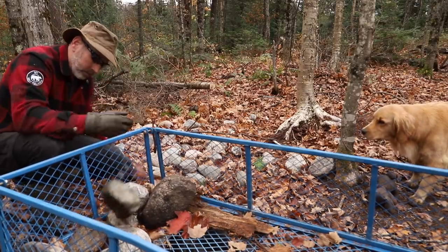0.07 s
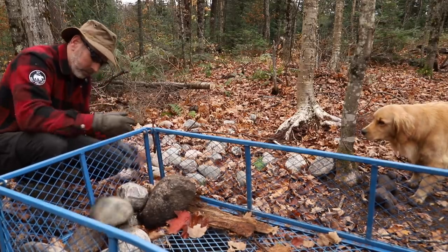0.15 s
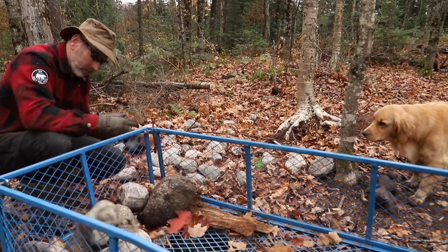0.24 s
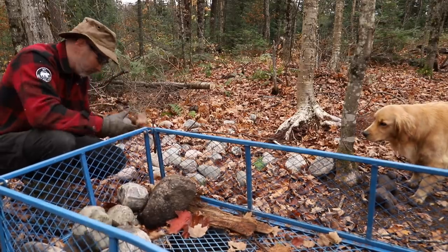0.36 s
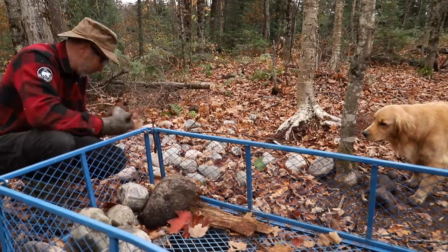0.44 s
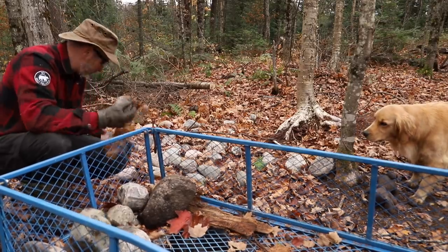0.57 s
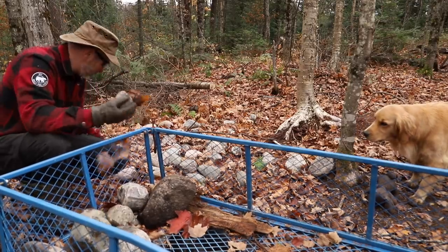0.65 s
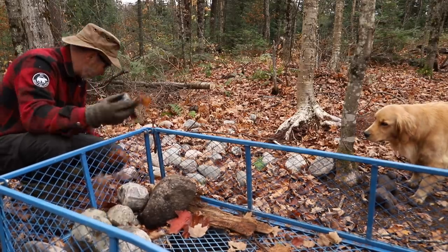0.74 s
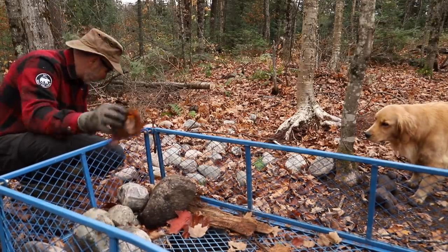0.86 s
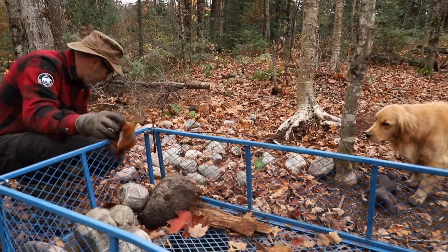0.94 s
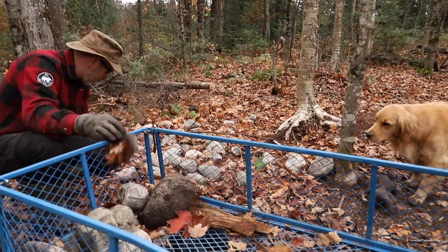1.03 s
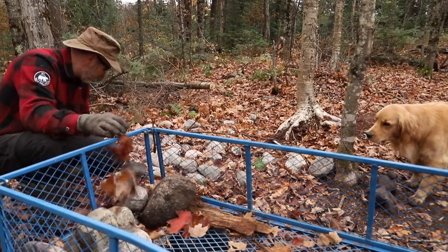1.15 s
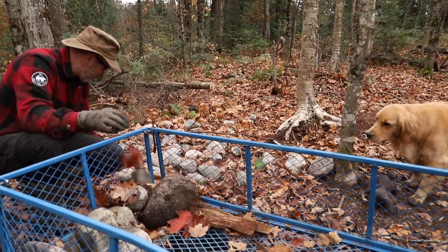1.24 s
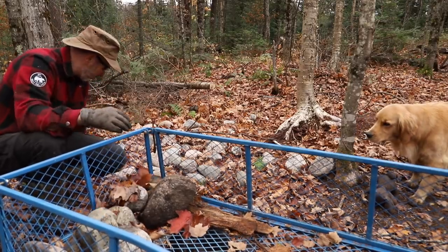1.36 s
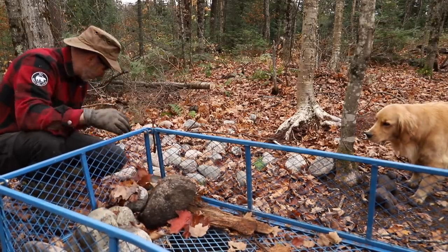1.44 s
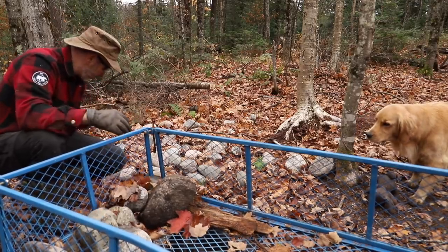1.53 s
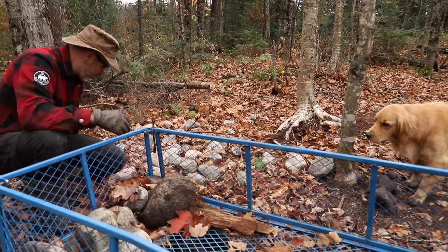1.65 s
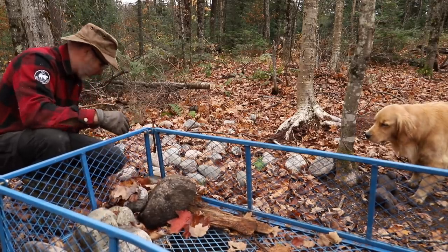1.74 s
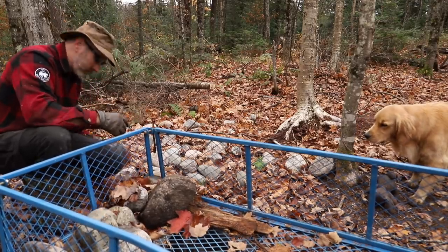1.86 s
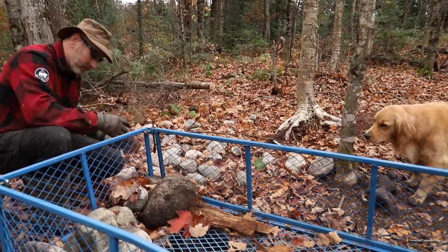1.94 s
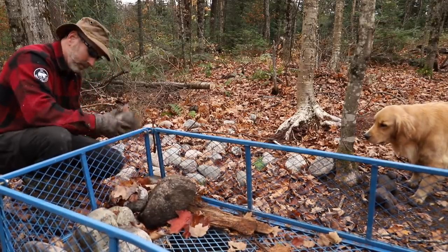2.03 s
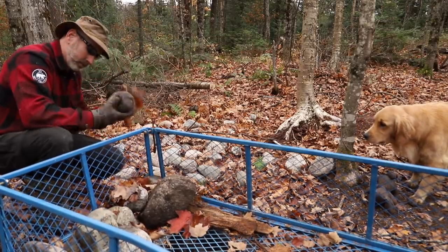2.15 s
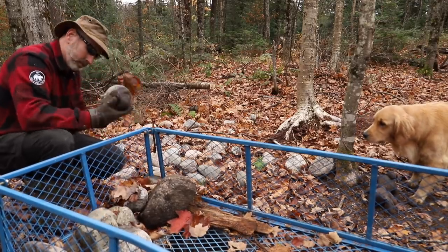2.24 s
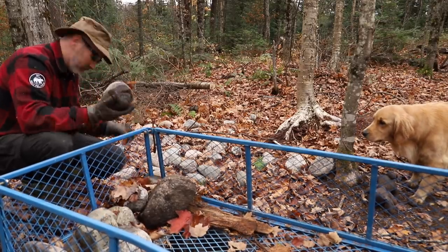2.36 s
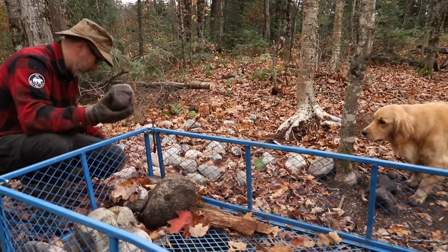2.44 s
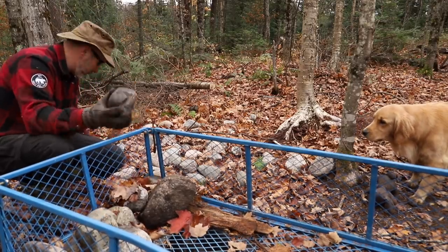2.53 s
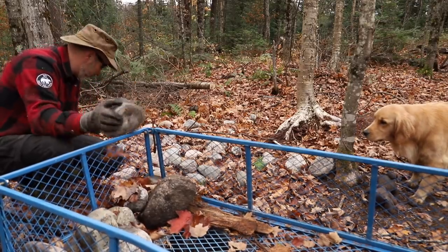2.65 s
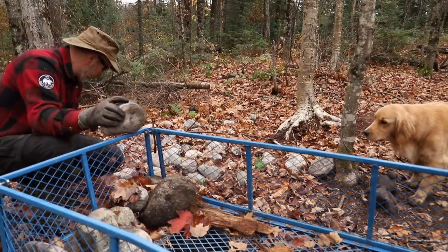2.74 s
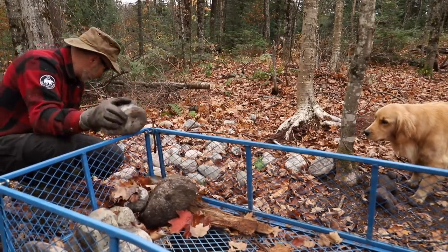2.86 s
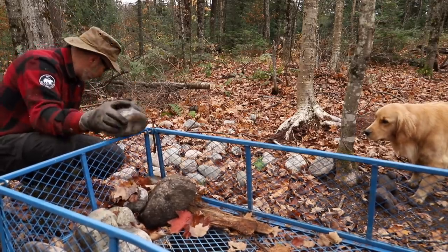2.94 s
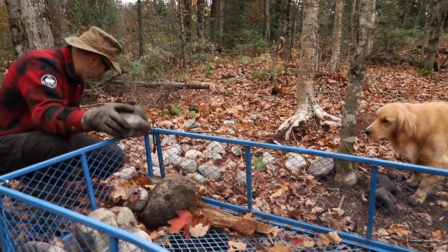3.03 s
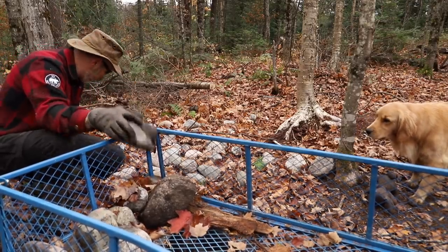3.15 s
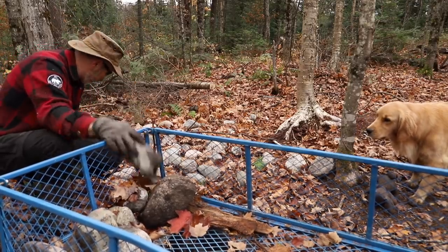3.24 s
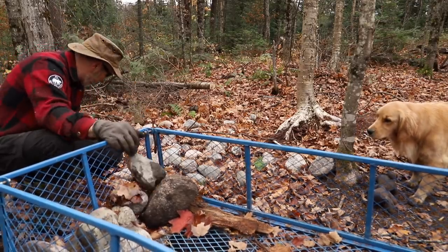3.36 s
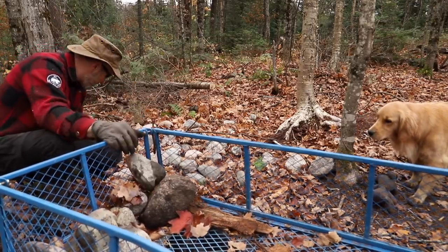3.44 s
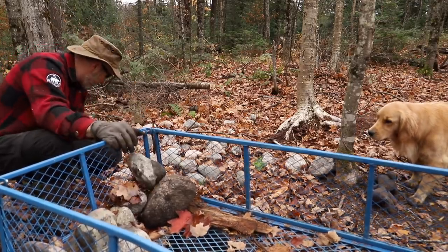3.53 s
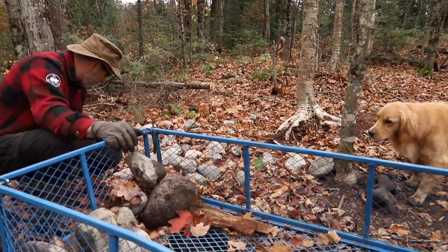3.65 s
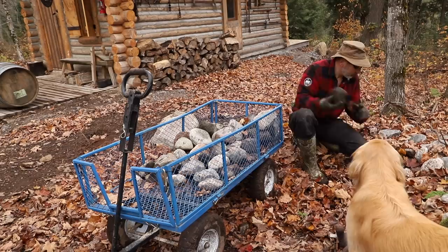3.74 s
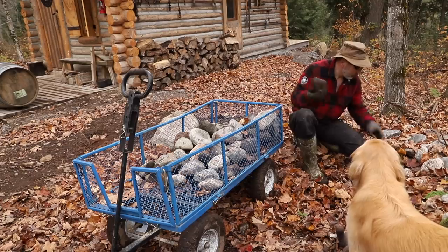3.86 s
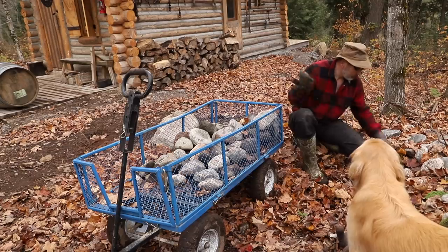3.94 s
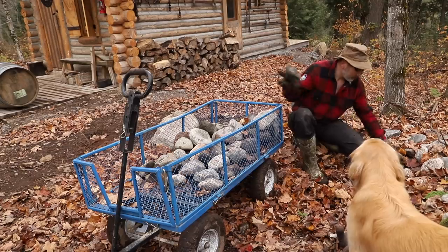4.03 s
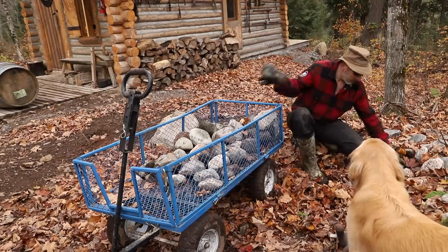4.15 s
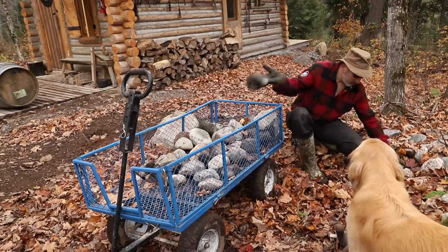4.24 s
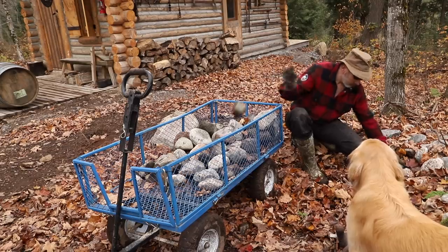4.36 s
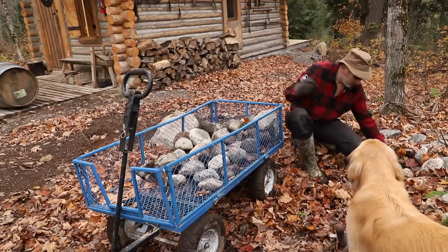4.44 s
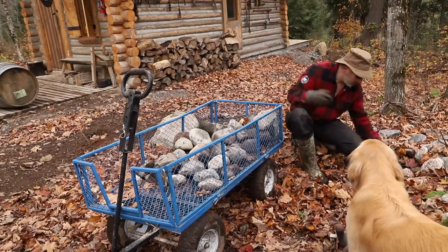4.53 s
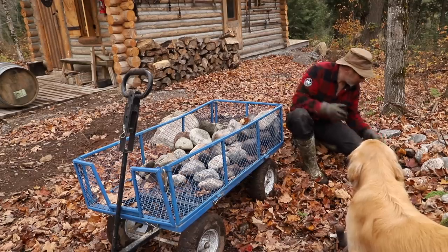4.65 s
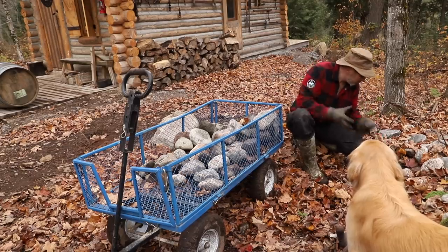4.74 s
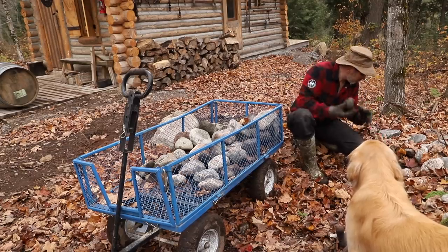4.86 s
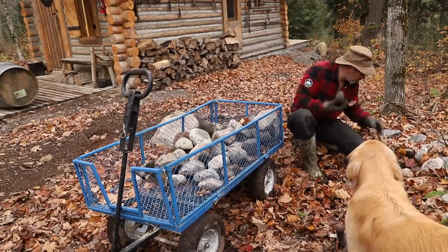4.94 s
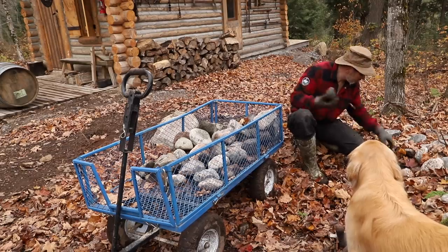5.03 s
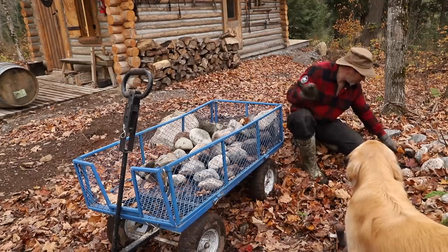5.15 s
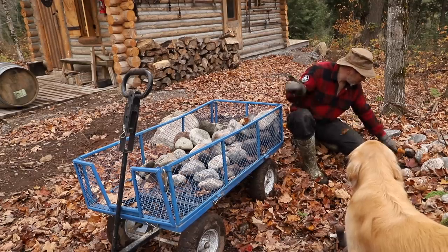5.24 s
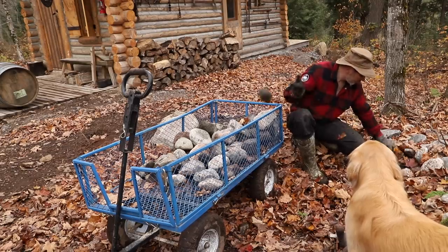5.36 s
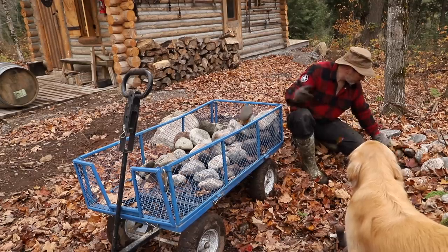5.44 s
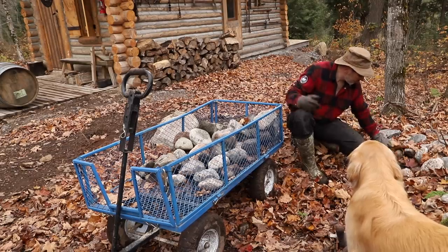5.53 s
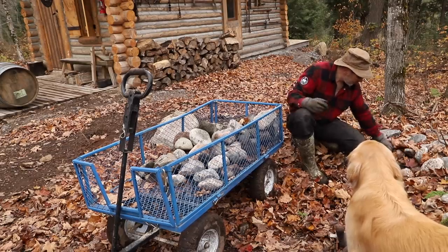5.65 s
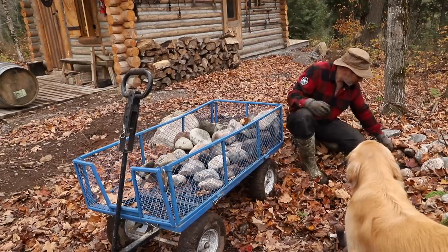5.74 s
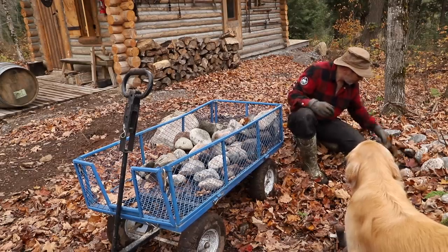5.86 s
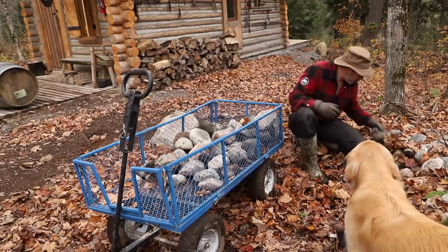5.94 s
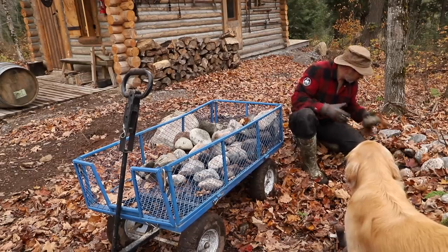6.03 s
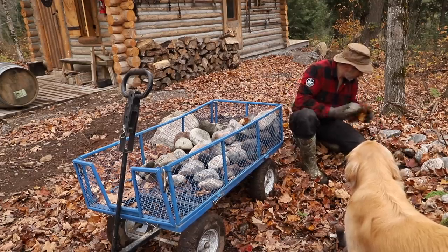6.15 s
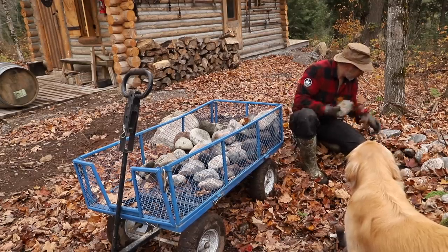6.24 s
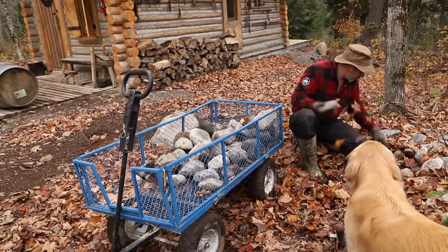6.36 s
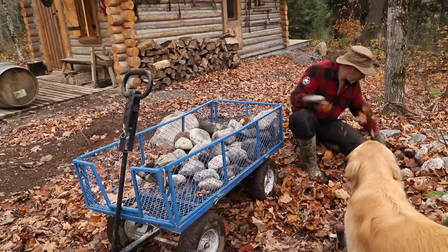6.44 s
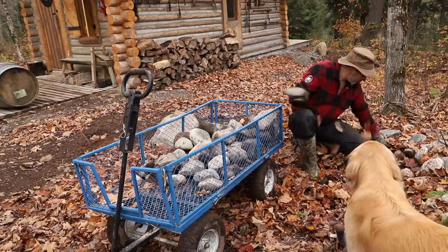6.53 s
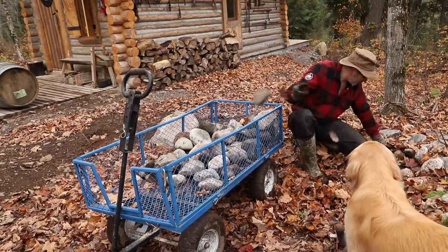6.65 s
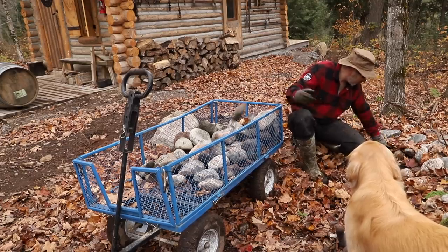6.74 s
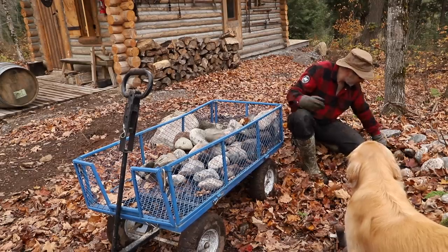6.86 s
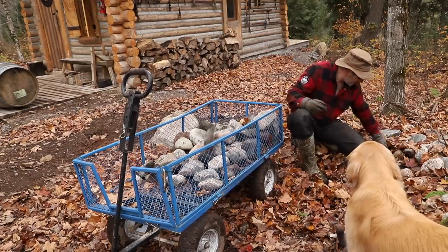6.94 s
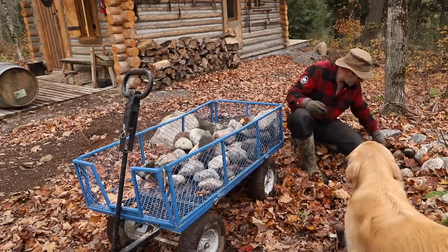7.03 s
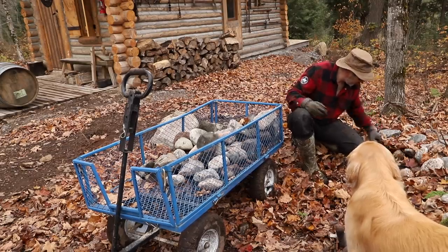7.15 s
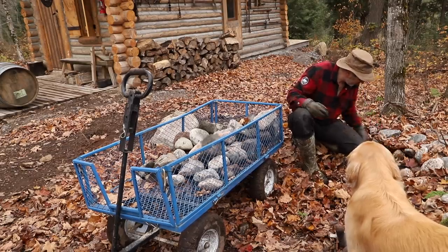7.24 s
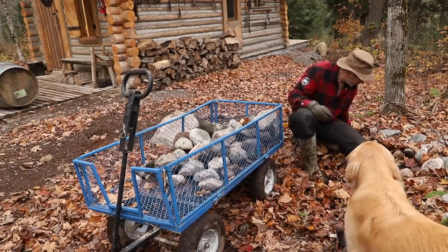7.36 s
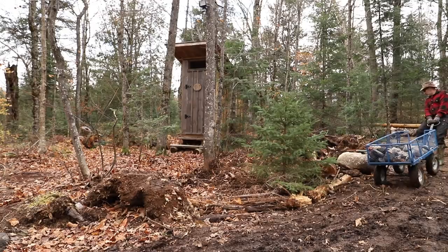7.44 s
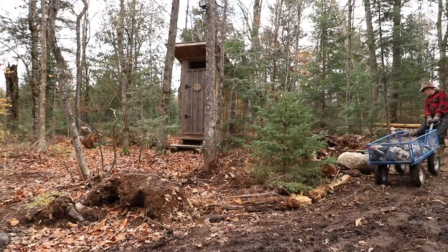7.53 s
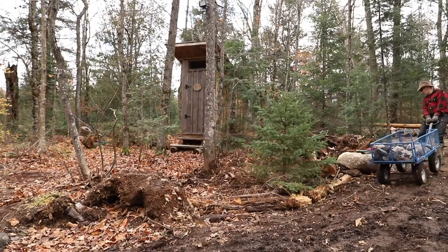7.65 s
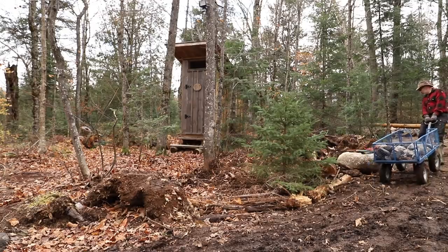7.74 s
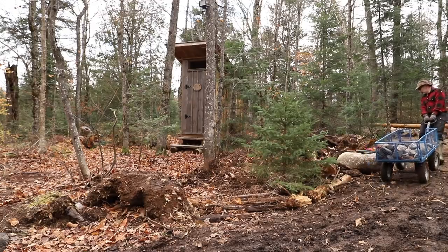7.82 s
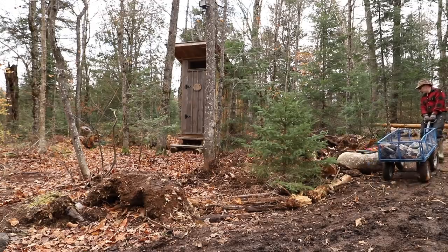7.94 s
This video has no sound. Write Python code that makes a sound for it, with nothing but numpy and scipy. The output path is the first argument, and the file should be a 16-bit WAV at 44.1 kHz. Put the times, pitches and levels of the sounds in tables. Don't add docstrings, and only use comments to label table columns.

```python
import sys
import numpy as np
from scipy import signal
from scipy.fft import rfft, irfft, next_fast_len
from scipy.io import wavfile
from scipy.ndimage import uniform_filter1d

SR = 44100
rng = np.random.default_rng(int(sys.argv[2]) if len(sys.argv) > 2 else 0)


def digitize_waveform(pressure):
    field = np.atleast_2d(pressure).T
    bounded = np.clip(field, -1, 1)
    quanta = np.round(bounded * 32767).astype(np.int16)
    wavfile.write(sys.argv[1], SR, quanta)


def level_to_linear(level):
    exponent = np.asarray(level, float) / 20
    return 10 ** exponent


N = 352355
TIME_S = np.arange(N) / SR

# start_s, left_lag_samples, then left over right of buzz_db, rattle_db, clacks_db
POSITIONS = [
    (0, -2.5, -6.5, -2, 0.5),
    (3.818, 2, -2.5, -5, -2),
    (5.0, 1, -8.5, -11, -4.5),
    (5.75, -2.5, -3, -9.5, -2.5),
    (7.484, 15, -19, -5, 3.5),
]
SECOND_PLACE_S, THIRD_PLACE_S = POSITIONS[1][0], POSITIONS[-1][0]
# pitch_hz, likeness (-1 to 1)
LIKENESS = [(40, 0.043), (150, 0.85), (600, 0.69), (1400, 0.49), (3000, -0.32), (8000, 0.017)]

# pitch_hz, level_db
AIR = [(15, -41), (25, -9.5), (59, -16), (123, -6), (153, -9), (405, -10.5), (3720, -14.5), (16000, -27)]
AIR_DB = -54.5
# time_s, level_db
HUM = [(0.0, -58.5), (3.28, -60), (3.8, -61.5)]
HUM_HZ = 78
# time_s, level_db
RUMBLE = [(0.0, -55), (2.6, -74), (2.76, -78.5), (6.99, -79.5), (7.99, -58.5)]

# pitch_hz, level_db
LEAVES = [(600, -40), (1100, -3.5), (1460, -6), (3040, 2), (5100, -1.5), (6560, -0.5), (11300, -7.5),
          (16000, -16.5)]
STEM_SHARE = 0.5
# pitch_hz, level_db
PILE = [(35, -52.5), (60, -4.5), (142, -5), (281, 0), (1830, 1.5), (2500, -7.5), (3250, -37), (5500, -120)]
# pitch_hz, level_db
MESH = [(1300, -43), (1770, -14), (2300, 4.5), (3000, 5), (4190, 0.5), (6190, -2), (9000, -8),
        (11700, -54.5)]
SHEEN_HZ, SHEEN_NEAR_DB, SHEEN_FAR_DB, SHEEN_DRIFT_DB = 3260, -18.5, -5, 8

# start_s, length_s, crackle_db, swell_db (change over the length)
SWEEPS = [(0.594, 0.37, -50.5, 8), (1.696, 0.78, -41.5, -13.5), (2.514, 0.19, -62, 18),
          (3.001, .3, -33, -7), (3.683, .14, -50.5, 5), (3.812, 0.79, -64, 1), (4.508, 0.16, -65, -8),
          (4.845, 0.34, -51, -19), (5.195, 0.44, -54, 3.5), (6.076, 0.22, -48, 5.5), (6.5, 0.57, -49, 0.5),
          (6.935, 0.57, -50, 7.5), (7.497, .6, -52, 1)]
SWEEP_MESH_DB, SWEEP_PILE_DB = -11, -11
# start_s, length_s, buzz_db, swell_db (change over the length), grinding_db (against buzz)
SHIFTS = [
    (0, 0.25, -24.5, -10, -11),
    (0.289, 0.25, -33, -3.5, -10),
    (0.967, 0.59, -38.5, 6, -12),
    (1.472, 0.49, -34, -35, -8),
    (2.876, 0.15, -38.5, 2, -10),
    (3.256, 0.24, -37.5, 5, -16.5),
    (3.5, 0.11, -37, 1, -14.5),
    (4.614, 0.26, -53, 7.5, -2.5),
    (5.69, 0.35, -47, 0.5, -1),
    (6.97, 0.45, -41.5, -8.5, -25),
]
SHIFT_LEAVES_DB = -4
EDGE_S, RELEASE_DB_PER_S = 0.03, 121
# start_s, buzz_db, t60_s (time to fade 60 dB), rumble_db
JOLTS = [(0.276, -13.5, 0.19, -13), (0.805, -30.5, 0.74, -33.5), (0.977, 3, 0.075, -10),
         (0.989, -15.5, 0.35, -38), (1.23, -7.5, 0.13, -26), (1.24, -18, 0.065, -44),
         (1.375, -12.5, 0.11, -11), (1.387, -11, 0.27, -22.5), (1.152, -24, 0.093, -36),
         (1.305, -23, 0.15, -40), (1.484, -16, 0.59, -29), (2.7378, -2.5, 0.12, -15.5),
         (2.774, -12.5, 0.4, -21.5), (3.009, -19, 0.63, -23.5), (3.284, -11.5, 0.32, -17),
         (3.374, -14, 0.21, -22), (3.383, -10, 0.22, -16), (3.396, -11, 0.058, -20), (3.542, -18, 0.2, -51),
         (3.601, -21, 0.46, -23.5), (4.524, -19.5, 0.52, -15), (4.637, -13.5, 0.027, 2.5),
         (4.723, -24.5, 0.31, -26), (5.6455, -24.5, 0.04, -32), (5.8065, -5, 0.24, -24),
         (5.824, -12, 0.18, -36), (5.843, -16, 0.099, -36), (5.885, -15.5, 0.34, -44),
         (5.923, -15, 0.19, -43), (5.959, -14, 0.26, -26), (5.997, -10.5, 0.12, -28),
         (6.916, -24.5, 0.72, -14), (7.035, -17.5, 0.083, -46), (7.091, -16.5, 0.25, -16),
         (7.112, -12.5, 0.067, -34)]
RATTLE_NEAR_DB, RATTLE_FAR_DB = -8.5, -17.5
# middle_s, half_length_s, leaf_db, pile_db
BRUSHES = [(0.939, 0.042, -31, -46), (2.668, 0.023, -43.5, -41.5), (7.402, 0.028, -35.5, -37.5),
           (7.733, 0.14, -60, -51.5), (2.232, 0.024, -34.5, -41), (2.368, 0.015, -47, -49.5),
           (4.339, 0.064, -45.5, -52.5), (4.94, 0.021, -44, -44.5), (5.014, 0.0086, -48.5, -51),
           (5.246, 0.034, -33, -49), (5.428, 0.021, -35, -55), (5.542, 0.062, -38, -51),
           (6.14, 0.034, -35.5, -63), (6.193, 0.014, -38, -51), (6.242, 0.011, -40, -44),
           (6.3, 0.02, -33.5, -39), (6.508, 0.015, -43.5, -53), (6.57, 0.042, -35.5, -47.5),
           (6.662, 0.03, -34, -54), (6.712, 0.0095, -31.5, -48), (6.76, 0.019, -38, -53),
           (6.828, 0.02, -44.5, -73), (7.264, 0.024, -39.5, -48), (7.343, 0.018, -33, -44.5)]

# start_s, peak_db
FRAME_HITS = [
    (0.978, -54),
    (2.74, -62),
]
FRAME_HZ, FRAME_T60_S = 13056, 1.6
# start_s, peak_db, pitch_hz
THUDS = [(0.256, -27, 330), (0.2736, -13, 340), (0.332, -19.5, 253), (0.497, -26.5, 265),
         (0.976, -26.5, 184), (1.227, -36, 342), (1.374, -30, 136), (1.697, -43, 56.5),
         (2.741, -30.5, 55.7), (3.397, -37, 281), (4.523, -28.5, 227), (5.646, -20.5, 110),
         (5.647, -27, 60), (5.857, -43, 90.5), (7.089, -21, 219), (7.098, -22, 257), (7.106, -25, 263),
         (7.175, -32, 250), (7.378, -20, 480), (7.388, -30, 352), (7.42, -27, 453), (7.463, -18, 537),
         (7.496, -44, 80), (7.548, -48, 119), (7.71, -39, 80)]
THUD_T60_S, THUD_CYCLES = 0.055, 9.7
# start_s, peak_db, pitch_hz, left_over_right_db
TICKS = [(0.3413, -23, 3250, -2), (1.2442, -1.5, 5800, 0), (1.2443, -2.5, 6400, 8),
         (2.462, -34.5, 4400, 10), (3.5487, -13.5, 4700, -21), (3.8068, -28, 3900, -3),
         (4.7955, -13, 4790, 3), (5.2692, -29, 3900, -23), (5.632, -29, 4300, 0), (5.886, -17, 8000, 3),
         (5.9589, -14.5, 7000, 14), (6.908, -27, 5750, 0), (6.33, -23, 6200, -8),
         (6.639, -16.5, 6500, -9.5), (6.695, -22.5, 5770, -11), (6.8693, -23, 5770, -11)]

# pitch_ratio (to its body pitch), level_db
STONE = [(.72, -2.5), (.86, 0), (1., 9.5), (1.17, 0), (1.4, -2), (1.899, -9.5)]
TURN = 0.5
CONTACT_DB, BOUNCE_CONTACT_DB, RAP_CONTACT_DB, CONTACT_S = 0.5, -5, -15.0, 0.00058
# start_s, peak_db, body_hz, t60_s
BLOWS = [(0.031, -18.5, 930, 0.018), (0.04, 1.5, 1408, 0.012), (0.097, -10, 1187, 0.03),
         (0.273, 4, 1600, 0.0124), (0.332, -2.5, 1505, 0.015), (0.426, -18.5, 1270, 0.031),
         (0.978, -10.5, 1580, 0.0045), (1.226, -0.5, 1383, 0.028), (1.228, -3.5, 930, 0.0059),
         (1.373, -4, 1820, 0.024), (2.739, -18.5, 1240, 0.026), (3.395, -5, 1250, 0.012),
         (3.661, -21, 1460, 0.027), (4.5222, 14.5, 1419, 0.015), (4.6357, 5.5, 1603, 0.012),
         (4.638, -6.5, 940, 0.024), (4.639, -5, 1420, 0.012), (4.669, -22, 1185, 0.03),
         (4.793, -22.5, 846, 0.032), (4.846, -12.5, 920, 0.023), (5.645, 12, 1587, 0.012),
         (5.646, -4.5, 908, 0.022), (5.6497, -9.5, 1280, 0.0089), (5.8565, -2, 1580, 0.019),
         (6.265, -37.5, 662, 0.019), (6.918, -0.5, 1254, 0.02), (6.957, -10.5, 1210, 0.028),
         (7.056, -29, 1380, 0.029), (7.088, -17, 510, 0.021), (7.375, -11.5, 1250, 0.009),
         (7.463, -17, 1205, 0.025), (7.759, -35.5, 710, 0.018)]
# start_s, peak_db
BOUNCES = [(0.104, -32), (0.111, -40), (0.127, -13), (0.146, -17), (0.152, -21), (0.213, -11.5),
           (0.285, -13), (0.2868, -14), (0.3437, -6), (0.351, -16), (0.434, -27), (0.54, -24),
           (1.2335, -25), (1.238, -24), (3.404, -10.5), (4.5295, -1), (4.537, -18), (4.5425, -8),
           (4.547, -21.5), (4.5615, -16), (4.648, -9.5), (4.656, -11), (4.71, -19), (5.659, -9),
           (5.69, -21), (5.72, -28), (5.744, -24.5), (5.867, -9), (5.876, -21), (6.929, -14), (6.932, -20),
           (6.963, -13.5), (6.9655, -8), (7.384, -29), (7.39, -20), (7.573, -38), (7.955, -34),
           (7.975, -34.5)]
BOUNCE_PITCH, BOUNCE_T60_S = 0.977, 0.012
# start_s, peak_db, pitch_hz, crack_db (against peak)
HIGH_TONES = [(0.0365, -15, 1650, -0.5), (0.0967, -29, 2600, -13.5), (0.2738, 5, 2437, -18),
              (0.3329, -13.5, 2020, -1.5), (0.2752, -3, 2460, -20), (0.3422, -23, 1915, 4),
              (1.2276, 12, 2060, -15.5), (1.3735, -2.5, 2070, -11.5), (2.7389, 0.5, 2380, -3.5),
              (3.3963, -2, 1890, 4.5), (3.4056, -15, 2840, 1), (3.7125, -31, 2076, -17.5),
              (4.5235, 18.5, 1800, -16.5), (4.524, 3.5, 2587, -19), (4.561, -11, 2450, -22),
              (4.636, -1, 2320, -25.5), (4.6394, 2, 2440, -23), (4.649, -20, 1750, -34),
              (5.6436, 9, 1688, -32.5), (5.645, 1.5, 3375, -18.5), (5.65, 3.5, 2090, -23.5),
              (5.6576, -1, 3280, -11.5), (5.689, -15, 2300, -20.5), (5.807, -8, 3880, -18),
              (5.8568, -18, 1710, -16), (6.9179, -10.5, 1590, -14), (6.957, -7, 2145, -29),
              (7.3758, -39, 1760, -3), (0.278, -13, 1980, -23), (0.334, -11, 2500, -18), (1.3745, -5, 2460, -18),
              (1.379, -21, 1500, -8), (3.604, -21, 2020, -30), (3.609, -22, 2080, -30),
              (3.661, -18.5, 2585, -19), (4.641, -9.5, 1800, -30), (5.6515, -2, 2580, -26),
              (7.091, -20, 1230, -30)]
# start_s, peak_db, crack_db (against peak)
RAPS = [(0.011, -6.5, -17), (0.061, -10, -7), (0.9771, 4.5, -10), (1.39, -22, -14), (1.482, -13.5, -3),
        (2.741, -6, -7), (2.785, -15, -2), (3.2732, -31, -19), (3.2876, -26, -4), (3.6142, -8, -25),
        (5.8135, -7, -25), (6, -12.5, -5), (7.0864, -29.5, 12.5), (7.3895, -30.5, 15)]
RAP_HZ, HIGH_T60_S, RAP_T60_S = 2883, 0.011, 0.022
TREES_T60_S, TREES_DB, TREES_HZ = 0.3, -33, 2000
CUTOFF_HZ = 16250


def rms_one(x):
    return x / np.sqrt(np.mean(x ** 2) + 1e-20)


def filtered(x, order, hz, kind):
    return signal.sosfilt(signal.butter(order, hz, kind, fs=SR, output="sos"), x)


def level_curve(rows):
    s, db = np.transpose(rows)
    return np.interp(TIME_S, s, db)


def at_hz(points, hz):
    table_hz, value = np.transpose(points)
    return np.interp(np.log(hz), np.log(table_hz), value)


def coloured(mid, side, spectrum):
    size = next_fast_len(N)
    hz = np.maximum(np.fft.rfftfreq(size, 1 / SR), 1)
    alike = np.clip(at_hz(LIKENESS, hz), -1, 1)
    shared = np.sqrt(1 + alike) * rfft(mid, size)
    opposed = np.sqrt(1 - alike) * rfft(side, size) * [[1], [-1]]
    both = (shared + opposed) * level_to_linear(at_hz(spectrum, hz))
    return rms_one(irfft(both, size)[:, :N])


def drift(rate):
    knots = rng.standard_normal(2000)
    return np.interp(TIME_S * rate, np.arange(2000), knots)


def grains(per_s, spread_db, clump_db, clump_rate):
    sizes = level_to_linear(spread_db * np.minimum(rng.exponential(1, N), 4)) * rng.choice([-1, 1], N)
    chance = per_s * level_to_linear(clump_db * drift(clump_rate)) / SR
    return sizes * (rng.random(N) < chance)


def rung(clicks, low_hz, high_hz, cycles, count):
    dealt, out = rng.integers(0, count, N), np.zeros(N)
    pitches = np.geomspace(low_hz, high_hz, count) * rng.uniform(0.9, 1.02, count)
    for k, hz in enumerate(pitches):
        r = level_to_linear(-60 * hz / (cycles * SR))
        w = 2 * np.pi * hz / SR
        hits = clicks * (dealt == k) + 1e-18
        ring = signal.lfilter([1, -1], [1, -2 * r * np.cos(w), r * r], hits)
        out += ring / np.sqrt(cycles)
    return out


def position(s):
    return [p for p in POSITIONS if p[0] <= s][-1]


def add(out, s, shape, pan_db, size):
    lag = position(s)[1] / SR
    t = np.arange(size) / SR - np.array([[max(lag, 0)], [max(-lag, 0)]])
    at = round(s * SR)
    blow = shape(np.maximum(t, 0)) * (t > 0) * level_to_linear(np.array([[pan_db], [-pan_db]]) / 2)
    out[:, at:at + size] += blow[:, :N - at]


def air():
    return level_to_linear(AIR_DB) * coloured(*rng.standard_normal((2, N)), AIR)


def hum():
    phase = 2 * np.pi * np.cumsum(HUM_HZ * (1 + 0.0048 * drift(7.6))) / SR
    level = np.sqrt(2) * level_to_linear(level_curve(HUM) + 0.8 * drift(5))
    return level * np.sin(phase) * (TIME_S < SECOND_PLACE_S)


def rumble():
    colour = [(15, -37), (28, -1.5), (60, 13.5), (120, -41), (300, -48.0)]   # pitch_hz, level_db
    return level_to_linear(level_curve(RUMBLE)) * coloured(*rng.standard_normal((2, N)), colour)


def leaves():
    stems = rms_one(rung(grains(170, 3.5, 3, 16), 3500, 13000, cycles=16, count=6))
    sides = []
    for side in range(2):
        crackle = rms_one(grains(5000, 2.8, 4.2, 45))
        sides.append(crackle + 0.07 * rng.standard_normal(N) + STEM_SHARE * stems)
    return coloured(*sides, LEAVES)


def pile():
    knocks = [rms_one(grains(900, 5.7, 3.5, 25)) + 1.54 * rng.standard_normal(N) for side in range(2)]
    return coloured(*knocks, PILE)


def mesh():
    wires = [rung(grains(9000, 2.77, 3.5, 70), 1609.5, 8450, cycles=88, count=32) for side in range(2)]
    return coloured(*wires, MESH)


def sheen(wires):
    top = filtered(wires, 2, [SHEEN_HZ, 2 * SHEEN_HZ], "band")
    place_db = np.where(TIME_S < SECOND_PLACE_S, SHEEN_NEAR_DB, SHEEN_FAR_DB)
    gain = level_to_linear(place_db + SHEEN_DRIFT_DB * drift(4.8))
    return (wires + gain * top) / (1 + gain / 2)


def strokes():
    t = np.arange(0, N + 64, 64) / SR

    def place(s):
        return np.searchsorted([SECOND_PLACE_S, THIRD_PLACE_S], s, side="right")

    rows = [(*row, [0, SHIFT_LEAVES_DB, pile_db]) for *row, pile_db in SHIFTS]
    rows += [(*row, [SWEEP_MESH_DB, 0, SWEEP_PILE_DB]) for row in SWEEPS]
    power = np.zeros((3, len(t)))
    for s, length, db, swell_db, share_db in rows:
        fade_in = np.clip((t - s) / EDGE_S + 0.5, 0, 1)
        gate = fade_in * (place(t) == place(s + length / 2))
        swell = swell_db * np.clip((t - s) / length, 0, 1)
        release = RELEASE_DB_PER_S * np.maximum(t - s - length, 0)
        power += gate * level_to_linear(db + swell - release + np.transpose([share_db])) ** 2
    return [np.interp(TIME_S, t, gain) for gain in np.sqrt(power)]


def jolts():
    since, out = np.arange(SR // 2) / SR, np.zeros((3, N + SR // 2))
    for s, buzz_db, t60, rumble_db in JOLTS:
        rattle_db = buzz_db + (RATTLE_NEAR_DB if s < SECOND_PLACE_S else RATTLE_FAR_DB)
        swell = (1 - np.exp(-since / 0.0025)) * level_to_linear(-60 * since / np.clip(t60, 0.03, 0.6))
        levels = level_to_linear([[buzz_db - 6.5], [rattle_db], [rumble_db - 12.5]])
        out[:, round(s * SR):][:, :SR // 2] += swell * levels
    return out[:, :N]


def brushes():
    out = np.zeros((2, N))
    for s, half, leaf_db, pile_db in BRUSHES:
        near = slice(round((s - 0.15) * SR), round((s + 0.15) * SR))
        out[:, near] += level_to_linear([[leaf_db], [pile_db]]) * np.exp(-((TIME_S[near] - s) / half) ** 2)
    return out


def frame():
    out = np.zeros((2, N))
    for s, db in FRAME_HITS:
        add(out, s, lambda t: level_to_linear(db - 60 * t / FRAME_T60_S) * np.sin(2 * np.pi * FRAME_HZ * t), 0, size=40000)
    return out


def thuds():
    out = np.zeros((2, N))
    for s, db, hz in THUDS:
        t60 = min(THUD_T60_S, THUD_CYCLES / hz)

        def push(t):
            phase = 2 * np.pi * hz * (t + 0.3 * 0.02 * (1 - np.exp(-t / 0.031)))
            return level_to_linear(db - 60 * t / t60) * np.sin(phase)

        add(out, s, push, 0.8, size=6000)
    return out


def ticks():
    out, noise = np.zeros((2, N)), rng.standard_normal(size=(30, 2, 2, 801))
    for (s, db, hz, pan_db), (wide, uneven) in zip(TICKS, noise):
        rough = 1 + 2.0 * uniform_filter1d(uneven, size=24)[:, 1:]

        def snap(t):
            ring = np.sin(2 * np.pi * hz * t) * rough
            return level_to_linear(db - 60 * t / 0.011) * (0.6 * ring + 0.1 * np.diff(wide))

        add(out, s, snap, pan_db, size=800)
    return out


def stone(t, hz, t60, draw, contact_db):
    ratio, mode_db = np.transpose(STONE)
    detune, uneven, turn = draw
    phase = 2 * np.pi * hz * ratio * (1 + 0.031 * detune) * t[..., None] + TURN * turn
    modes = (level_to_linear(mode_db + 2.2 * uneven) * np.sin(phase)).sum(axis=-1)
    contact = 1 + level_to_linear(contact_db) * np.exp(-t / CONTACT_S)
    onset = 1 - np.exp(-t / 0.00021)
    return modes * contact * onset * level_to_linear(-60 * t / np.clip(t60, 0.004, 0.03))


def stone_bodies():
    out = np.zeros((2, N))
    bodies = [(*row, CONTACT_DB) for row in BLOWS]
    for s, db in BOUNCES:
        landed_hz = [row[2] for row in BLOWS if row[0] < s][-1]
        bodies.append((s, db, BOUNCE_PITCH * landed_hz, BOUNCE_T60_S, BOUNCE_CONTACT_DB))
    draws = rng.standard_normal(size=(100, 2, 3, len(STONE)))
    for (s, db, hz, t60, contact_db), draw in zip(bodies, draws):

        def clack(t):
            knock = level_to_linear(-21.5) * stone(t, 870.0, t60, draw[1], contact_db)
            return level_to_linear(db - 10.5) * (stone(t, hz, t60, draw[0], contact_db) + knock)

        add(out, s + 0.000914, clack, position(s)[4], size=1400)
    return out


def stone_high_tones():
    out = np.zeros((2, N))
    grit = filtered(rng.standard_normal((2, N + 1400)), 2, [3800, 11000], "band")
    grit = (grit + 0.5 * grit[0]) * level_to_linear([[3.0], [-1.0]])
    edges = [(*row, HIGH_T60_S, CONTACT_DB) for row in HIGH_TONES]
    edges += [(s, db, RAP_HZ, crack_db, RAP_T60_S, RAP_CONTACT_DB) for s, db, crack_db in RAPS]
    draws = rng.standard_normal(size=(60, 3, len(STONE)))
    for (s, db, hz, crack_db, t60, contact_db), draw in zip(edges, draws):
        crack = level_to_linear(crack_db + 8.5) * grit[:, round(s * SR):][:, :1400]

        def strike(t):
            return level_to_linear(db - 10.0) * (stone(t, hz, t60, draw, contact_db) + crack * level_to_linear(-60 * t / 0.0092))

        add(out, s + 0.00064, strike, position(s)[4], size=1400)
    return out


def clacks():
    return filtered(stone_bodies() + stone_high_tones(), 2, 400, "high")


def trees(x):
    t = np.arange(SR // 2) / SR
    wash = rng.standard_normal((2, len(t))) * level_to_linear(-60 * t / TREES_T60_S) * (1 - np.exp(-t / 0.0023))
    wash = filtered(0.43 * wash[0] + 1.1 * wash, 1, TREES_HZ, "low")
    return level_to_linear(TREES_DB) * signal.fftconvolve(x, rms_one(wash) / np.sqrt(len(t)), axes=1)[:, :N]


def scene():
    shake, crush, rub = strokes()
    buzz, rattle, grind = jolts()
    brush_leaves, brush_pile = brushes()
    rattle, grind = rattle + brush_leaves, grind + brush_pile
    now = np.searchsorted([p[0] * SR for p in POSITIONS], np.arange(N), side="right") - 1
    pans_db = np.array(POSITIONS)[now] / 2
    buzz_pan, rattle_pan = (level_to_linear(pans_db[:, k] * np.array([[1], [-1]])) for k in (2, 3))

    background = air() + hum() + rumble()
    ground = rattle_pan * np.hypot(level_to_linear(2.5) * crush, rattle) * leaves()
    stones = np.hypot(level_to_linear(6) * rub, grind) * pile()
    wires = buzz_pan * np.hypot(level_to_linear(5.0) * shake, buzz) * sheen(mesh())
    blows = clacks() + ticks()
    return background + ground + stones + wires + frame() + thuds() + blows + trees(blows)


def roll_off(x):
    return signal.sosfilt(signal.butter(12, 16150, fs=SR, output="sos"), x)


def record(dry):
    overloaded = np.clip(dry, -0.93, 0.93)
    top_cut = signal.cheby2(12, 60, CUTOFF_HZ, fs=SR, output="sos")
    return roll_off(signal.sosfilt(top_cut, overloaded))


dry = scene()
out = record(dry)
digitize_waveform(out)
```